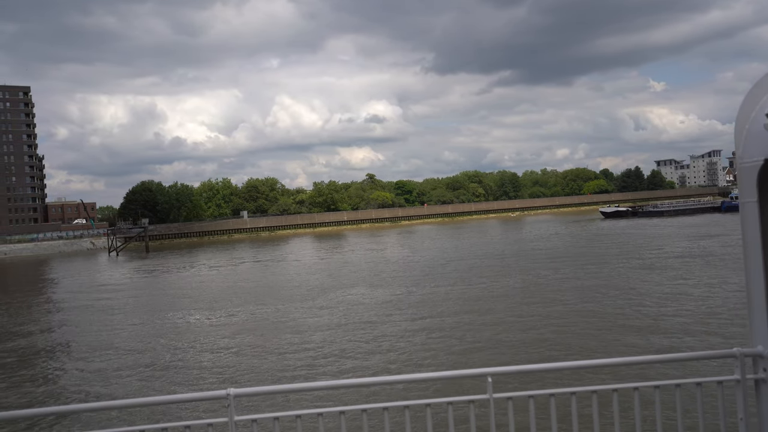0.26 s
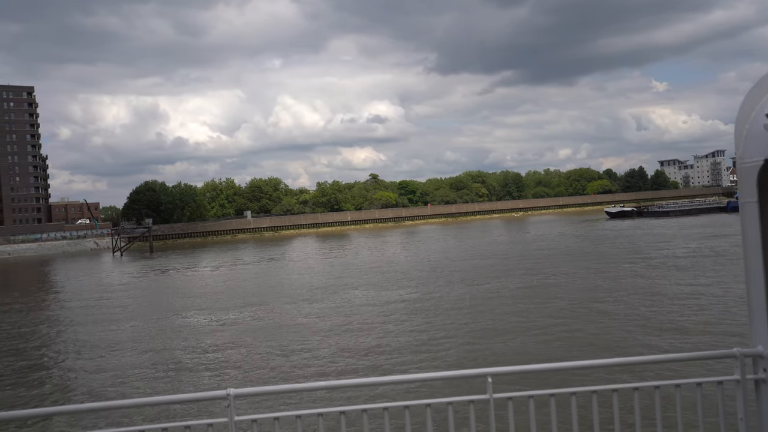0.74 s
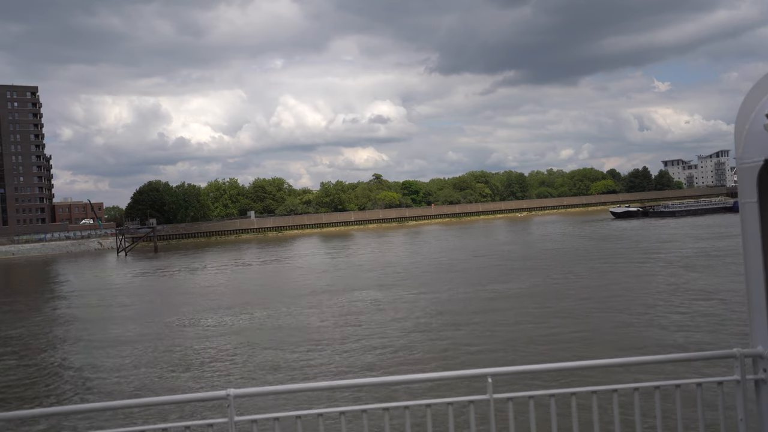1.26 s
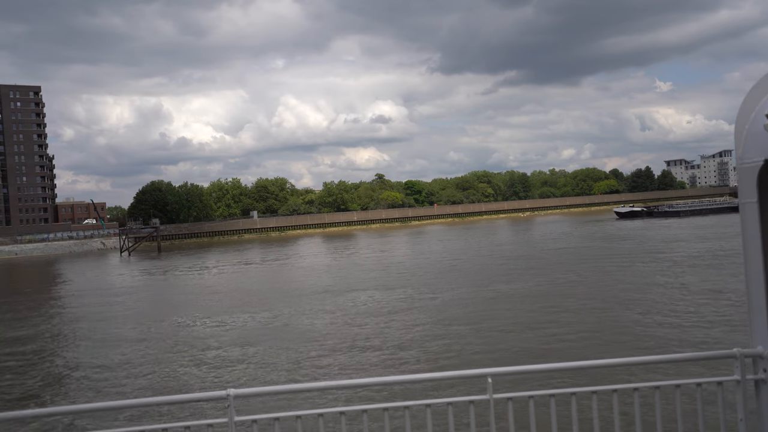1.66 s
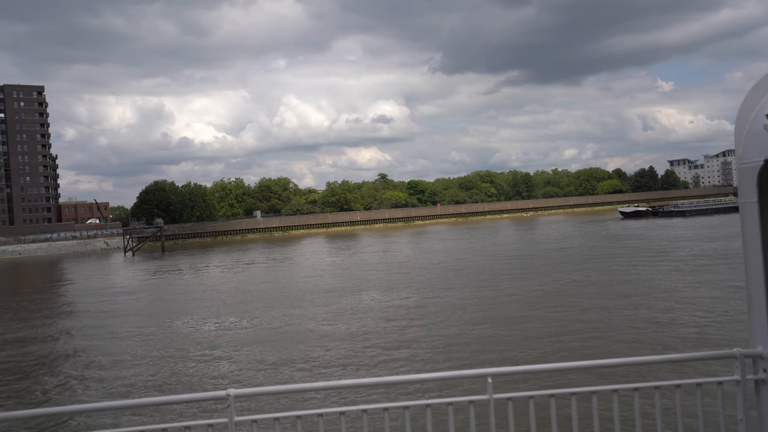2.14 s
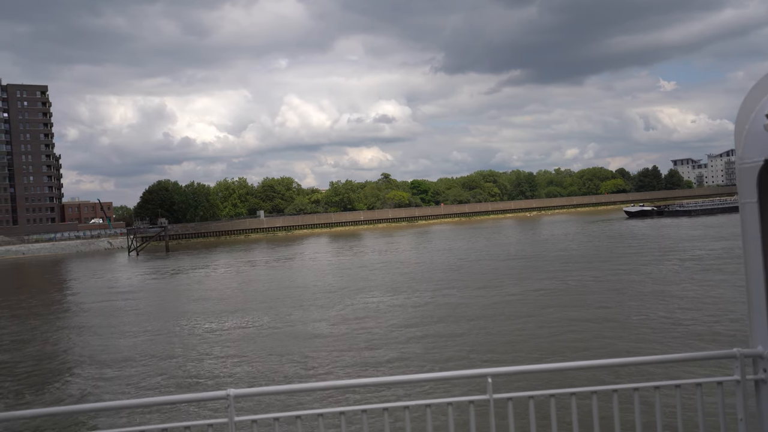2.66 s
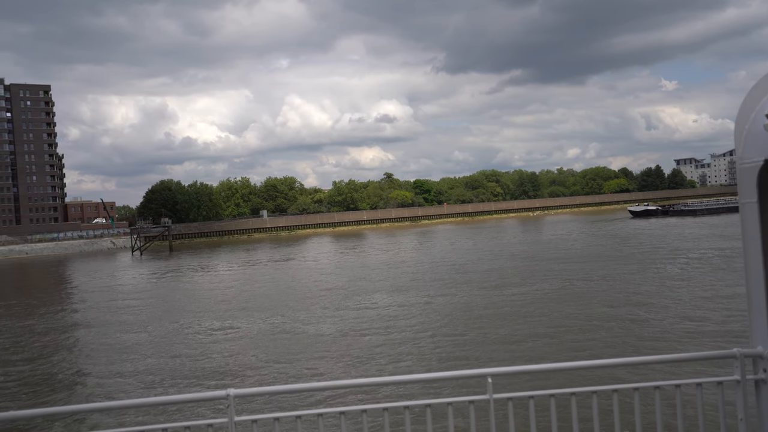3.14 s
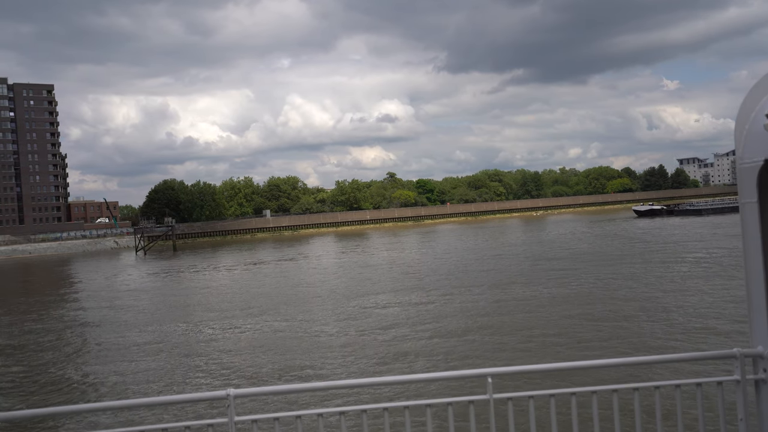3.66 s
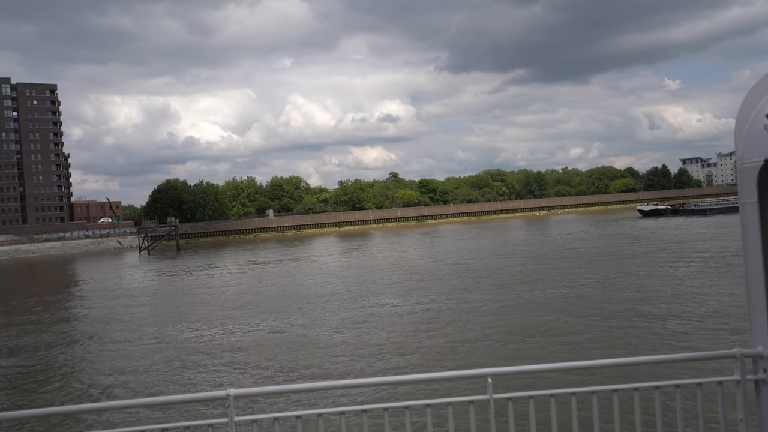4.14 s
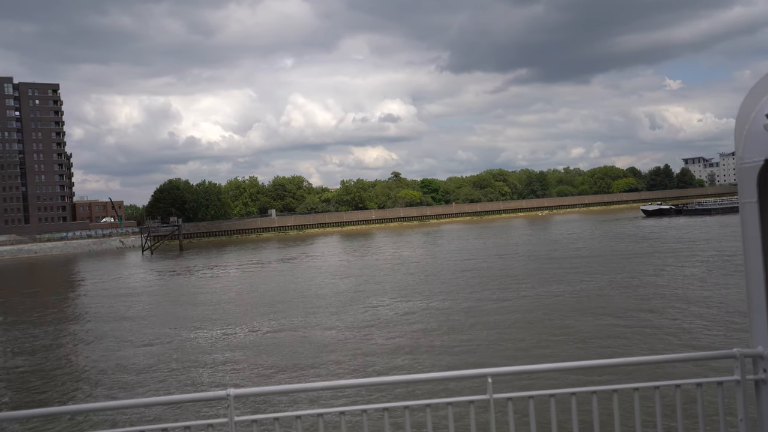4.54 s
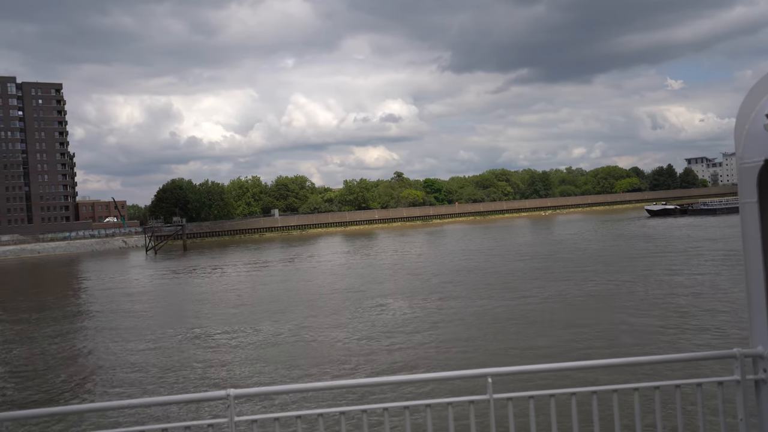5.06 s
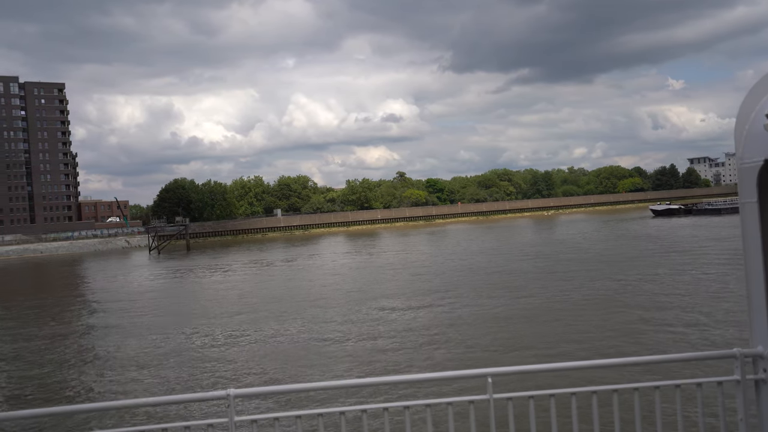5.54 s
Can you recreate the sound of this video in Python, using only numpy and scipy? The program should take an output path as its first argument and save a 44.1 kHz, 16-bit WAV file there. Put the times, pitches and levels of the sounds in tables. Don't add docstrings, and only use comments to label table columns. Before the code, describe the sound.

Steady low ferry engine rumble and hum with deep hull and wind thuds, later joined by close light knocks and faint cloth rubs.

```python
import sys
import numpy as np
from scipy import signal
from scipy.fft import rfft, irfft
from scipy.io import wavfile
from scipy.ndimage import uniform_filter1d

SR = 44100
rng = np.random.default_rng(int(sys.argv[2]) if len(sys.argv) > 2 else 0)


def boost_factor(decibels):
    exponent = np.asarray(decibels, float) / 20
    return 10 ** exponent


def wrap_up_sound(samples):
    columns = np.atleast_2d(samples).T
    tamed = np.clip(columns, -1, 1)
    steps = np.round(tamed * 32767).astype(np.int16)
    wavfile.write(sys.argv[1], SR, steps)


N = 255780
HZ = np.fft.rfftfreq(N, 1 / SR)
TIME = np.arange(N) / SR

# crest t/s, level/dB, f/Hz, sag/(dB/s)
WAVES = [(0.0, -24.5, 18.4, 23.5), (0.532, -31, 25, 123), (0.888, -23.5, 18.2, 63),
         (1.358, -32.5, 16.3, 90.5), (1.699, -27.5, 21.6, 128), (2.003, -29, 18.8, 31),
         (2.208, -30.5, 24.2, 201), (2.419, -35, 14.7, 91), (2.621, -28, 16.5, 37), (2.8, -30, 19.4, 18.5),
         (3.662, -28.5, 19.4, 47), (3.87, -26, 18.3, 111), (4.05, -33, 18.7, 15), (4.351, -31.5, 18.9, 39),
         (4.53, -32.5, 27.5, 66), (4.748, -26.5, 19.3, 66), (4.949, -32, 27.6, 19), (5.33, -18, 24.76, 107),
         (5.541, -35, 19, 27), (5.672, -34, 30, 56)]
# t/s, level/dB
GUSTS = [(0.05, -43), (0.47, -43), (0.65, -50), (0.89, -45), (1.15, -40), (1.45, -45), (1.702, -46),
         (2.27, -37.5), (2.461, -38.5), (3.09, -38.5), (3.55, -41), (3.96, -40), (4.471, -29), (4.72, -38),
         (4.898, -34.5), (5.07, -35.5), (5.35, -30.5), (5.55, -30.5), (5.7, -32.5)]
# f/Hz, density/(dB per Hz)
BUFFET = [(24, -2), (30, 0), (36, -8), (44, -15), (54, -18), (64, -20), (74, -24), (82, -28), (100, -32),
          (140, -42), (1000, -110)]
HEAVE_RISE_DB_S = 146
GUST_RISE_DB_S, GUST_FALL_DB_S, BREEZE_DB = 113.5, 72, -43

ORDER_DB = [-47, -55, -59, -63, -47.5, -55, -68, -68, -74, -74, -69, -82, -82, -84, -80, -79, -77, -84, -76,
            -79]
SHAFT_HZ = 15.0

# f/Hz, level/dB rms
BEATS = [(24., -40)]
# t/s, f/Hz, level/dB
SURGES = [(0.38, 63.0, -48.7), (0.62, 64.5, -45.2), (0.89, 46.5, -48.3), (1.01, 67.0, -45.7),
          (1.15, 44.5, -47.6), (1.23, 57.0, -48.2), (1.33, 67.5, -41.0), (1.45, 58.0, -46.5),
          (1.63, 80.0, -55.1), (1.67, 44.5, -49.1), (1.87, 56.0, -49.9), (1.98, 68.0, -43.9),
          (2.0, 43.5, -47.1), (2.18, 52.5, -44.9), (2.24, 67.5, -44.3), (2.3, 59.0, -46.1),
          (2.54, 65.5, -47.5), (2.74, 48.0, -46.9), (2.92, 62.5, -46.1), (3.23, 56.5, -47.1),
          (3.23, 66.0, -46.9), (3.49, 66.0, -46.6), (3.59, 47.5, -45.3), (3.71, 64.5, -45.3),
          (4.19, 70.0, -48.1), (4.27, 49.5, -41.4), (4.44, 66.5, -41.4), (4.76, 48.5, -42.5),
          (4.82, 60.5, -44.5), (4.92, 66.0, -45.1), (4.98, 50.0, -42.2), (5.14, 68.5, -45.1),
          (5.22, 57.0, -44.7), (5.34, 42.5, -34.7), (5.52, 54.5, -46.1), (5.58, 64.0, -44.2),
          (1.6, 55, -47), (1.62, 66, -49), (2.62, 56, -48), (5.12, 44, -44)]
MAIN_HZ, MAIN_DB, MAIN_WAVER_DB = 67.5, -56.5, 2.3
SURGE_S, SWELL_S = 0.14, 0.16

# f/Hz, width/Hz, level/dB rms
PLATES = [(70, 4.5, -60), (96.4, 2.6, -62), (322, 9.5, -70), (180, 5.8, -69), (219, 13, -66.5),
          (309, 3.7, -70), (346, 4.5, -70), (363, 3, -71), (384, 5.3, -69), (399, 4.3, -68),
          (415.5, 4, -75.5), (464.8, 7.1, -69), (499.2, 12, -68.5), (579.7, 0.7, -76), (589, 1.1, -75),
          (713, 2.7, -81), (601, 2, -77), (665, 8.3, -79), (752, 10, -77), (828, 5.8, -75.5),
          (876, 77, -73.5), (1209, 20, -77), (1296, 50, -80), (1523, 24, -78), (3620, 60, -96),
          (4330, 120, -93), (4800, 70, -94), (5600, 140, -92)]
# t/s, f/Hz, level/dB
PLATE_SWELLS = [(0.18, 312.0, -63.2), (0.26, 342.0, -63.3), (0.48, 363.0, -59.3), (0.58, 343.5, -63.9),
                (0.75, 362.5, -59.5), (0.85, 310.0, -60.9), (0.87, 179.5, -59.7), (0.97, 384.0, -62.7),
                (1.05, 343.5, -62.6), (1.13, 363.0, -61.5), (1.17, 397.5, -63.7), (1.19, 309.5, -60.9),
                (1.29, 214.5, -61.5), (1.43, 178.5, -60.3), (1.47, 309.0, -63.0), (1.49, 464.5, -64.5),
                (1.85, 179.0, -59.8), (2.0, 344.0, -63.0), (2.16, 399.0, -63.1), (2.24, 362.5, -63.4),
                (2.28, 308.5, -60.5), (2.48, 361.5, -63.2), (2.54, 309.5, -61.3), (2.66, 179.0, -59.5),
                (2.72, 383.0, -62.6), (2.9, 309.0, -61.1), (3.33, 310.5, -63.2), (3.33, 362.0, -63.7),
                (3.35, 177.0, -62.4), (3.67, 385.5, -63.2), (3.83, 308.5, -62.3), (3.89, 323.0, -64.2),
                (4.15, 178.5, -61.9), (4.23, 309.5, -64.3), (4.31, 383.0, -62.9), (4.54, 179.0, -61.0),
                (4.6, 308.5, -63.7), (4.88, 383.0, -60.5), (4.92, 361.0, -64.1), (5.38, 310.5, -64.5),
                (5.42, 362.5, -64.5), (5.48, 342.5, -61.3), (5.67, 211.0, -63.4), (5.71, 308.0, -63.8),
                (5.71, 384.5, -63.4), (.12, 399, -63), (2.95, 398, -66), (3.15, 500, -66), (3.2, 398, -66),
                (3.4, 384, -65), (4.45, 399, -65), (4.65, 384, -66)]
# f/Hz, density/(dB per Hz)
ROAR = [(45, -69), (62, -69), (78, -75), (95, -71), (110, -79), (140, -77.5), (160, -79), (240, -88),
        (350, -85), (430, -90), (530, -88.5), (700, -92), (1050, -97), (1700, -100), (3000, -112),
        (4300, -115), (5700, -117), (11500, -134.5), (16000, -144)]

# t/s, click level/dB, dull re click/dB, top re click/dB, fade/s
KNOCKS = [(1.204, -55, 3, -24, 0.099), (1.26, -65.5, 12, -35, 0.034), (4.3015, -58, -15, -32, 0.058),
          (4.726, -56, 7, -10, 0.12), (4.753, -52.5, 3, -29, 0.082), (4.815, -49.5, 8, -33, 0.073),
          (4.8376, -53, 2.5, -33, 0.033), (5.2273, -41, -4, -5.5, 0.069), (5.253, -57, 16, -9, 0.032),
          (5.285, -62.5, -23, -28, 0.082), (5.5596, -72.5, 21, -28, 0.059)]
# f/Hz, width/Hz, level/dB
CLICK_MODES = [(2700, 600, -4), (3250, 350, -3), (3600, 250, -1), (4400, 900, -10), (5300, 700, -4),
               (6400, 500, -5), (7150, 450, -5)]
# f/Hz, width/Hz, level/dB
DULL_MODES = [(722, 330, -0.5), (870, 240, -6.5), (1160, 490, -4), (1510, 640, -14), (1910, 600, -7.5)]
# f/Hz, width/Hz, level/dB
TOP_MODES = [(9000, 1400, -6), (11000, 600, 0), (12500, 800, -6), (14500, 1500, -20)]
# f/Hz, width/Hz, level/dB
SCUFF_MODES = [(2700, 2100, 8.5), (5750, 5800, 0)]
# t/s, f/Hz, level/dB, fade/s
RINGS = [(1.206, 2780, -55.5, .025), (1.207, 3700, -66, .04), (1.262, 3700, -67, .04),
         (1.207, 5550, -64, .05), (1.208, 4650, -64, .04), (1.206, 5270, -62, .04), (1.208, 6820, -64, .05),
         (1.213, 1226, -52, .06), (1.26, 2750, -62, .03), (1.262, 5200, -71, .04), (1.268, 1200, -55, .04),
         (4.731, 3262, -62, .06), (4.746, 3280, -62, .04), (4.746, 1990, -62, .04), (4.768, 2600, -65, .05),
         (4.756, 7000, -67, .025), (4.728, 1200, -51, 0.043), (4.756, 3300, -57, .05),
         (4.762, 3550, -60, .04), (4.757, 5460, -69, .05), (4.756, 650, -47, .06),
         (4.816, 732, -47.5, 0.099), (4.817, 2034, -53.5, .035), (4.817, 5650, -62, .04),
         (4.822, 4700, -65, .05), (4.843, 1250, -44, .06), (4.842, 766, -45, 0.077),
         (4.842, 6360, -68, .06), (5.228, 5220, -55, 0.034), (5.228, 6700, -52, .04),
         (5.23, 7095, -52, .05), (5.23, 10900, -58, .1), (5.233, 3590, -56, .1), (5.228, 3150, -55, .035),
         (5.228, 12500, -62, .04), (5.25, 670, -42.5, .08), (5.274, 140, -35.5, .2), (5.247, 212, -39, .18),
         (4.82, 130, -49, .2), (5.262, 480, -49, .06), (5.249, 1970, -52, .04), (5.257, 770, -47, 0.05),
         (5.257, 1184, -51.5, 0.044), (5.25, 1150, -50, .04), (5.258, 1660, -53, .04),
         (5.272, 906, -56, .05), (5.259, 7100, -61, .05), (5.284, 4470, -69, .05), (5.284, 6400, -64, .05),
         (5.5605, 887, -52, .06), (5.5605, 2120, -62, .04),
         (5.247, 370, -42, .08), (5.228, 890, -52, .05), (5.262, 255, -52, .22),
                (5.229, 1150, -52, .05), (5.254, 10950, -66, .06), (4.822, 3300, -63, .06)]
# t/s, level/dB, fade/s
TICKS = [
    (1.152, -71, .012),
    (1.535, -65, .012),
    (1.583, -76, .01),
]
# f/Hz, width/Hz, level/dB
TICK_MODES = [(8000, 2500, -2), (10200, 1500, 0)]
# t/s, level/dB, fade/s
THUMPS = [
    (4.818, -46, 0.098),
    (5.25, -43, 0.07),
    (5.275, -52, 0.2),
]
# f/Hz, width/Hz, level/dB
THUMP_MODES = [(139, 38, 9), (210, 81, -1.5), (355, 113, -7), (540, 210, -11)]
ROUGH_DB = 1.5

# full speed t/s, level/dB, rise/(dB/s), hold/s, fall/(dB/s)
STROKES = [(3.43, -75, 82, 0.048, 65), (3.594, -81.5, 192, 0.027, 153), (3.953, -84.5, 45, 0.008, 597),
           (4.087, -76.5, 177, 0.018, 55), (4.316, -76.5, 1507, 0.12, 293), (4.56, -70.5, 248, 0.06, 157),
           (4.754, -75, 306, .01, 700), (4.82, -68.5, 251, 0.011, 148), (4.921, -74.5, 204, 0.018, 84),
           (5.016, -79, 151, 0.018, 53), (5.253, -66.5, 604, 0.011, 191), (5.44, -84.5, 73, 0.012, 498),
           (5.512, -79.5, 305, 0.009, 907), (5.592, -89, 201, .01, 108), (5.749, -68.5, 384, 0.011, 10),
           (5.79, -74.5, 110, .02, 99)]
# f/Hz, density/(dB per Hz)
CLOTH = [(600, -48), (1500, -38), (3000, -38.5), (6200, -36), (7400, -38.5), (8500, -43), (11500, -48),
         (13500, -50.5), (15600, -56.5)]
# full speed t/s, level/dB, rise/(dB/s), hold/s, fall/(dB/s)
FINE_STROKES = [
    (3.45, -90, 60, .14, 120),
    (4.545, -88, 300, .1, 200),
]
# f/Hz, density/(dB per Hz)
FINE_CLOTH = [(10500, -12), (12500, 0), (14200, -2), (15600, -12)]

TOP_EDGES_HZ = [12050, 12750, 13400, 14100, 14800, 16000]
TOP_GATE_DB = -96


def unit(x):
    return x / np.sqrt(np.mean(x ** 2))


def colour(points):
    hz, db = np.transpose(points)
    gain = boost_factor(np.interp(np.log(HZ + 1), np.log(hz), db))
    return gain / (1 + (hz[0] / (HZ + 1)) ** 4)


def peak(hz, width_hz):
    return 1j * HZ * width_hz / (hz ** 2 - HZ ** 2 + 1j * HZ * width_hz)


def noise(gain=1):
    return unit(irfft(rfft(rng.standard_normal(N)) * gain, N))


def walk(rate_hz):
    return noise(1 / (1 + (HZ / rate_hz) ** 2))


def swell(s, db, rise_db_s, hold_s, fall_db_s):
    climb_db = rise_db_s * np.clip(s - TIME, 0, None)
    sag_db = fall_db_s * np.clip(TIME - s - hold_s, 0, None)
    return boost_factor(db - climb_db - sag_db)


def flickering(points, swell_db, flicker_db, rate_hz):
    out, common = 0, walk(0.85)
    white = rfft(rng.standard_normal(N)) * colour(points) * np.sqrt(SR / 2)
    for octave in np.arange(10) + 5:
        share = np.cos(np.pi / 2 * np.clip(np.log2(HZ + 1) - octave, -1, 1)) ** 2
        out = out + irfft(white * share, N) * boost_factor(swell_db * common + flicker_db * walk(rate_hz))
    return out


def singing(rows, spread_s, wander, drivers_hz):
    out, reach, drivers_hz = np.zeros(N), int(4 * spread_s * SR), np.array(drivers_hz)
    for s, hz, db in rows:
        near = slice(max(int(s * SR) - reach, 0), int(s * SR) + reach)
        t = TIME[near] - s
        driver_hz = drivers_hz[np.argmin(abs(drivers_hz - hz))]
        envelope = np.sqrt(2) * boost_factor(db) * np.exp(-(t / spread_s) ** 2)
        out[near] += envelope * np.sin(2 * np.pi * (hz * t + driver_hz * s) + wander[near])
    return out


def touch(s, db, fade_s):
    age = np.clip(TIME - s, 0, None)
    rise = 1 - np.exp(-age / 0.001)
    return boost_factor(db) * rise * np.exp(-np.log(1000) * age / max(fade_s, 0.004))


def scrape(rows, modes):
    force = sum(touch(*row) for row in rows)
    body = sum((-1) ** k * boost_factor(db) * peak(hz, width) ** 2 for k, (hz, width, db) in enumerate(modes))
    rung = irfft(rfft(force * rng.standard_normal(N)) * body, N)
    return rung / np.sqrt(np.mean(abs(body) ** 2))


def hull_and_wind():
    heave = 0
    for s, db, hz, sag_db_s in WAVES:
        envelope = uniform_filter1d(swell(s, db, HEAVE_RISE_DB_S, 0, sag_db_s), size=1500)
        heave = heave + envelope * np.cos(2 * np.pi * hz * (TIME - s))
    gusts = sum(swell(s, db, GUST_RISE_DB_S, 0, GUST_FALL_DB_S) for s, db in GUSTS)
    wind = boost_factor(BREEZE_DB) + gusts
    return np.sqrt(2) * heave + wind * noise(colour(BUFFET))


def governed_engine():
    start = rng.uniform(0, 2 * np.pi, len(ORDER_DB))
    waver_db = [1.2 * walk(3.0) for _ in range(4)]
    out = 0
    for k, db in enumerate(ORDER_DB):
        gain = np.sqrt(2) * boost_factor(db + waver_db[k % 4])
        out = out + gain * np.sin(2 * np.pi * (k + 2) * SHAFT_HZ * TIME + start[k])
    return out


def main_engines():
    beats = sum(boost_factor(db + 2.8 * walk(1.0)) * np.sin(2 * np.pi * hz * TIME + 1.1 * walk(0.7))
                for hz, db in BEATS)
    waver_db, wander = MAIN_WAVER_DB * walk(0.91), 0.4 * walk(1.5)
    tone = boost_factor(MAIN_DB + waver_db) * np.sin(2 * np.pi * MAIN_HZ * TIME + wander)
    surges = singing(SURGES, SURGE_S, wander, [44.5, 49.0, 57.0, MAIN_HZ])
    return np.sqrt(2) * (tone + beats) + boost_factor(-1.5) * surges


def plates():
    power = sum((boost_factor(db) * unit(abs(peak(hz, 1.73 * width)) ** 2)) ** 2 for hz, width, db in PLATES)
    return noise(np.sqrt(power)) * np.sqrt(np.mean(power))


def roar_and_wash():
    return flickering(ROAR, 0.3, 0.5, 22.0)


def plate_swells():
    drivers_hz = [179.0, 214.0, 309.5, 323.0, 343.5, 362.5, 384.0, 398.5]
    return boost_factor(-0.6) * singing(PLATE_SWELLS, SWELL_S, 0.6 * walk(1.8), drivers_hz)


def knocks():
    s, db, dull_db, top_db, fade_s = np.transpose(KNOCKS)
    click = scrape(zip(s, db - 9.0, fade_s), CLICK_MODES)
    scuff = scrape(zip(s, db - 12.5, 2.0 * fade_s), SCUFF_MODES)
    dull = scrape(zip(s, db + dull_db - 7.0, 1.92 * fade_s), DULL_MODES)
    top = scrape(zip(s, db + top_db - 12.5, 1.3 * fade_s), TOP_MODES)
    rattle = 0.7 * walk(150.0)
    ring = 0
    for t, hz, ring_db, ring_fade_s in RINGS:
        phase = 2 * np.pi * hz * (TIME - t) + min(hz / 4000, 1) * rattle
        ring = ring + touch(t, ring_db, ring_fade_s) * np.sin(phase)
    ring = ring * boost_factor(ROUGH_DB * walk(120.0))
    ticks, thumps = scrape(TICKS, TICK_MODES), scrape(THUMPS, THUMP_MODES)
    return click + scuff + dull + top + ring + ticks + thumps


def cloth():
    stroke = sum(swell(*row) for row in STROKES)
    grain = boost_factor(0.73 * walk(90.0))
    return stroke * grain * flickering(CLOTH, 0.18, 1.0, 30.0)


def fine_cloth():
    return sum(swell(*row) for row in FINE_STROKES) * noise(colour(FINE_CLOTH))


def scene():
    vessel = hull_and_wind() + governed_engine() + main_engines() + plates() + roar_and_wash() + plate_swells()
    close_by = knocks() + cloth() + fine_cloth()
    return (vessel + close_by)[None]


def low_pass(x):
    return signal.sosfilt(signal.butter(12, 15690, fs=SR, output="sos"), x)


def record(dry):
    top = signal.sosfiltfilt(signal.butter(4, 3000, "high", fs=SR, output="sos"), dry[0])
    bass, spectrum = dry[0] - top, rfft(top)
    for lo_hz, hi_hz in zip(TOP_EDGES_HZ, TOP_EDGES_HZ[1:]):
        band = irfft(spectrum * (HZ >= lo_hz) * (HZ < hi_hz), N)
        heard = uniform_filter1d(band ** 2, size=1024) > boost_factor(TOP_GATE_DB) ** 2
        gate = uniform_filter1d(1.0 * heard, size=256)
        top += band * (gate - 1)
    return low_pass((top + bass)[None])


dry = scene()
out = record(dry)
wrap_up_sound(out)
```